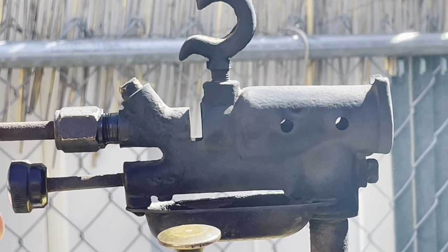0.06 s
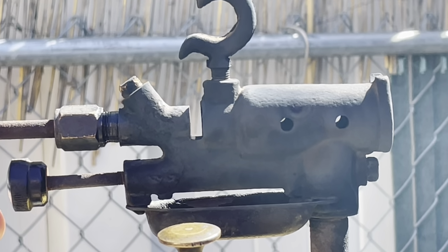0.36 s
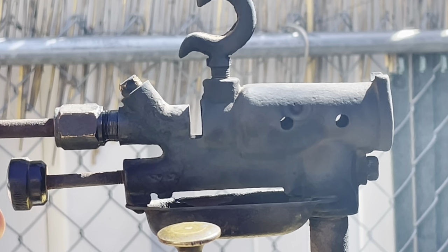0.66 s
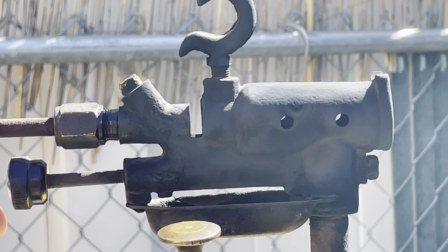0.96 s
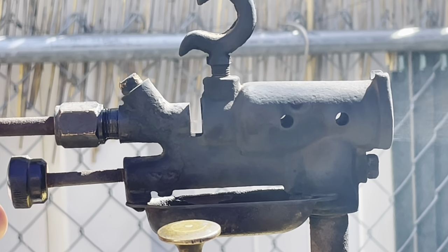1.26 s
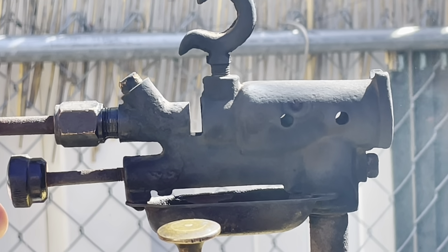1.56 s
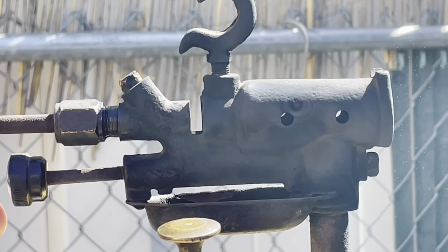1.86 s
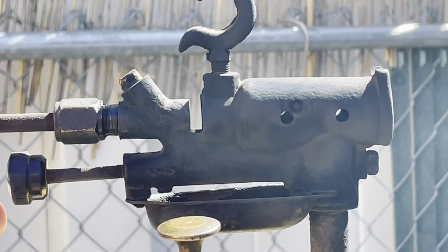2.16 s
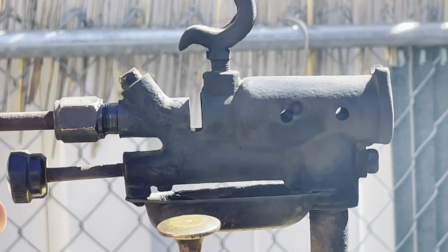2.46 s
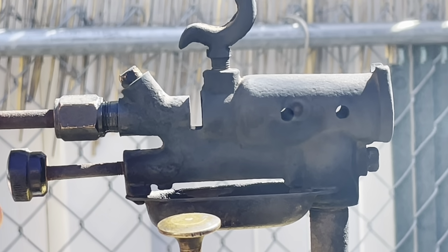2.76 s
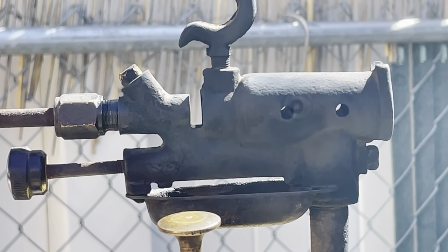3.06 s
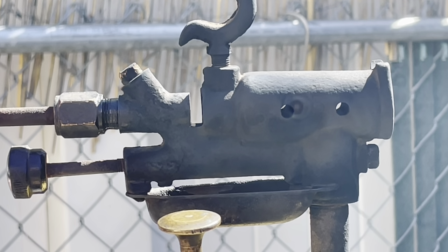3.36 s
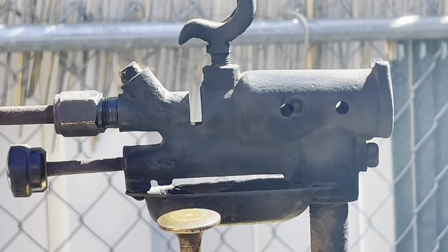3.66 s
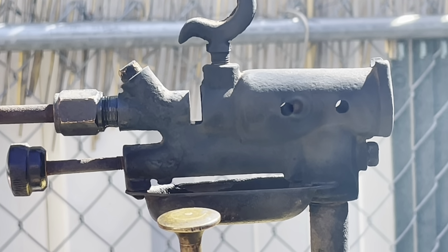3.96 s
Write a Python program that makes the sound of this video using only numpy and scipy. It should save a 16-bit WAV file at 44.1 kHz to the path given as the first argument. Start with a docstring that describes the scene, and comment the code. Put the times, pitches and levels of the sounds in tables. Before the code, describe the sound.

A blow torch burns close by outdoors, a fluttering roar and low rumble under a bright, ringing hiss. At about 1.25 seconds the flame falters: the roar drops, the ringing sags in pitch, and gas rushes and sizzles with a faint thin whistle. By about 1.8 seconds the roar and pitch have climbed back, and the torch burns steadily with small surges until 4 seconds.

```python
"""A fluttering roar with a bright hiss: a liquid-fuel blow torch burns outdoors, close by.
The swirling flame makes the rumble and roar. The jet of fuel vapour hisses and makes the
burner tube ring. After about 1.25 s the flame falters: the roar drops, the tube's pitch sags,
and gas rushes, sizzles and whistles. Within half a second the roar and the pitch climb back."""
import sys
import numpy as np
from scipy import signal
from scipy.fft import rfft, irfft, next_fast_len
from scipy.io import wavfile
from scipy.ndimage import uniform_filter1d, map_coordinates

SR = 44100
rng = np.random.default_rng(int(sys.argv[2]) if len(sys.argv) > 2 else 0)


def dump(signal):
    """Clip the signal to [-1, 1] and save it as 16-bit WAV at the path in sys.argv[1]."""
    limited = np.clip(np.atleast_2d(signal).T, -1, 1)
    pcm = np.round(limited * 32767).astype(np.int16)
    wavfile.write(sys.argv[1], SR, pcm)


N = 176400  # 4 s


def amp(db):
    """Turn decibels into a number to multiply by."""
    return 10 ** (np.asarray(db) / 20)


def unit(x):
    """Scale a signal to an average size (rms) of 1."""
    return x / np.sqrt(np.mean(x ** 2) + 1e-20)


def over_frequency(rows, hz):
    """Join (frequency, value) points with lines, on a scale of octaves."""
    f, value = np.transpose(rows)
    return np.interp(np.log(hz + 1), np.log(f + 1), value)


def over_time(rows):
    """Join (time, value) points with lines, one value per sample."""
    return np.interp(np.arange(N) / SR, *np.transpose(rows))


def filtered(x, response):
    """Multiply each frequency in x by response(hz)."""
    size = x.shape[-1]
    padded = next_fast_len(size + SR // 4)
    hz = np.fft.rfftfreq(padded, 1 / SR)
    return irfft(rfft(x, padded) * response(hz), padded)[..., :size]


def wobble(per_s):
    """A smooth curve through per_s random points a second."""
    points = rng.standard_normal(N // 8)
    return unit(map_coordinates(points, [np.arange(N) * per_s / SR], mode="wrap"))


def flutter(slowest_hz=49):
    """A quick random tremble with no slow drift."""
    return unit(filtered(wobble(per_s=200), lambda hz: 1 - np.exp(-(hz / slowest_hz) ** 2)))


def churn(swirls, sway_db, flutter_db, crackle_db, own_db):
    """The flame's swirls shake a layer's loudness, and the layer adds a flutter of its own."""
    sway, tremble, crackle = swirls
    return unit(amp(sway_db * sway + flutter_db * tremble + crackle_db * crackle + own_db * flutter()))


def roughen(x, depth_db):
    """Turn brief random patches of the sound up or down, each about 1.5 kHz wide."""
    spectra = signal.stft(x, nperseg=256)[2]
    patches = uniform_filter1d(rng.standard_normal(spectra.shape[1:]), size=9, axis=0)
    patches = uniform_filter1d(patches, size=3, axis=1)
    rough = signal.istft(spectra * amp(depth_db * unit(patches)), nperseg=256)[1]
    return unit(rough[:, :N])


# How alike left and right are, 1 meaning the same (f/Hz, likeness)
LIKENESS = [(40, 0.94), (100, 1), (900, 0.98), (1400, 0.89), (1700, 0.35), (1950, .995), (3400, 0.97),
            (3900, .999), (6100, .999), (6500, 1), (10000, 1), (11500, .97), (15000, 1)]
def stereo_noise(gain, size=N):
    """Noise shaped by gain(hz): a part both sides share, plus a part that sets them apart."""
    def shares(hz):
        angle = np.arccos(np.clip(over_frequency(LIKENESS, hz), -1, 1)) / 2
        return gain(hz) * np.array([np.cos(angle), np.sin(angle)])
    mid, side = filtered(rng.standard_normal((2, size)), shares)
    return unit(np.array([mid + side, mid - side]))


def ringing(bands, pitch):
    """Bands of noise that slide together: a pitch below 1 plays them slower, and so lower."""
    def gain(hz):
        peaks = (amp(db) / (1 + ((hz - centre) / (width / 1.7)) ** 2) for centre, width, db in bands)
        return np.sqrt(sum(peak ** 2 for peak in peaks))
    noise = stereo_noise(gain, size=N + SR // 4)
    position = np.cumsum(pitch)
    return unit(np.array([map_coordinates(side, [position], order=5, mode="mirror") for side in noise]))


# The whistle's wandering pitch and loudness (t/s, f/Hz, level/dB)
WHISTLE_PATH = [(0, 7000, -90), (1.235, 7000, -70), (1.266, 6680, -41), (1.288, 6600, -60),
                (1.31, 6750, -47.5), (1.34, 6250, -57), (1.41, 6250, -56), (1.45, 6550, -51),
                (1.495, 6850, -46), (1.515, 6750, -54), (1.535, 6950, -49.5), (1.57, 7200, -57),
                (1.66, 7350, -90)]
def whistle(width_hz=320):
    """The jet whistles thinly while the flame is weak, more breath than tone."""
    hz = over_time([(t, f) for t, f, db in WHISTLE_PATH])
    level_db = over_time([(t, db) for t, f, db in WHISTLE_PATH])
    return amp(level_db) * ringing([(hz.mean(), width_hz, 0)], pitch=hz / hz.mean())


# Loudness of the sizzle (t/s, level/dB)
SIZZLE_LEVEL = [(0, -90), (1.16, -75), (1.2, -54), (1.26, -45), (1.3, -47), (1.42, -44.5), (1.53, -49),
                (1.65, -53), (1.9, -90)]
# Its two high bands (f/Hz, width/Hz, relative level/dB)
SIZZLE_PEAKS = [(8700, 910, 6), (11750, 1500, -6)]
def sizzle():
    """The jet sizzles while the flame is weak."""
    return amp(over_time(SIZZLE_LEVEL)) * ringing(SIZZLE_PEAKS, pitch=np.ones(N))


# Loudness of the rushing gas (t/s, level/dB)
GAS_LEVEL = [(0, -90), (1.24, -80), (1.28, -42), (1.38, -41), (1.47, -33.5), (1.55, -40), (1.68, -46),
             (1.8, -90)]
# Its bands (f/Hz, width/Hz, relative level/dB)
GAS_PEAKS = [(1229, 440, 0), (2070, 250, -7), (2760, 270, -3), (3300, 250, -2)]
def gas_rush():
    """Gas rushes through the tube while the flame is weak."""
    return amp(over_time(GAS_LEVEL)) * ringing(GAS_PEAKS, pitch=np.ones(N))


# Tone colour of the hiss (f/Hz, relative level/dB)
HISS_COLOUR = [(1000, -12.5), (1350, -2), (1700, -16), (1860, -1.8), (2400, -7), (3400, 0), (3620, -3),
               (3780, -6), (4000, -5), (4300, -10), (4900, -9), (5200, -14.5), (5480, -13), (5700, -21),
               (5950, -15), (6300, -17.5), (6700, -17), (9000, -24), (9850, -26), (10700, -23),
               (12500, -30), (15800, -33)]
def jet_hiss(strength_db, swirls, level_db=-38):
    """The vapour jet hisses roughly, and dips less than the flame does."""
    hiss = roughen(stereo_noise(lambda hz: amp(over_frequency(HISS_COLOUR, hz))), depth_db=1.5)
    hiss *= churn(swirls, sway_db=0.2, flutter_db=0.74, crackle_db=1.54, own_db=0.56)
    return amp(level_db + 0.45 * strength_db) * hiss


# The tube's main pitch (t/s, f/Hz)
TUBE_PITCH = [(0, 3430), (1.12, 3427), (1.23, 3310), (1.29, 2816), (1.39, 2787), (1.48, 2934), (1.62, 3216),
              (1.76, 3355), (2.1, 3415), (4, 3394)]
def tube_pitch(full_flame_hz=3420):
    """The tube's pitch, about 1 at full flame; it sags and wavers more as the flame falters."""
    pitch = over_time(TUBE_PITCH) / full_flame_hz
    sag = np.tanh(np.maximum(1 - pitch, 0) / 0.05006)  # levels off past a drop of about 5 %
    waver = .006 + 0.0219 * sag
    return pitch * (1 + waver * wobble(per_s=75))


# Where the tube rings at full flame, main and upper bands (f/Hz, width/Hz, relative level/dB)
MAIN_PEAKS = [(3446, 274, 2), (3190, 420, -5.5), (2710, 380, -13)]
UPPER_PEAKS = [(4670, 870, -5), (7340, 1120, 2.2), (8830, 1070, -0.5), (10760, 1050, -6.5),
               (13400, 1500, -16)]
# How each set swells and fades (t/s, relative level/dB)
MAIN_SWELLS = [(0, 0.6), (.65, -0.5), (1.2, -1), (1.255, -1.5), (1.283, -8), (1.305, -5), (1.37, -4.5),
               (1.435, -2.5), (1.467, 4), (1.5, 0.5), (1.63, 0.5), (1.8, 1), (4, .5)]
UPPER_SWELLS = [(0, 1), (.6, 1.5), (.76, 5), (.86, -1.5), (1.25, 0), (1.35, -4.5), (1.7, 1), (2.1, -1.5),
                (4, -1)]
def burner_tube(swirls, main_db=-31, upper_db=-47.5, edge_hz=3620):
    """The jet makes the tube ring; the main ring falls away steeply above edge_hz."""
    pitch = tube_pitch()
    main = filtered(ringing(MAIN_PEAKS, pitch), lambda hz: 1 / np.sqrt(1 + (hz / edge_hz) ** 70))
    main *= churn(swirls, sway_db=0.2, flutter_db=0.93, crackle_db=1.5, own_db=1.6)
    main *= amp(main_db + over_time(MAIN_SWELLS))
    upper = roughen(ringing(UPPER_PEAKS, pitch), depth_db=1.1)
    upper *= churn(swirls, sway_db=0.6, flutter_db=0.45, crackle_db=0.9, own_db=-0.4)
    upper *= amp(upper_db + over_time(UPPER_SWELLS))
    return main + upper


# The flame's brief surges (+) and lulls (-) (t/s, length/s, relative level/dB)
FLAME_SURGES = [(0.025, .05, 5), (.192, 0.032, 3.5), (0.267, 0.033, -5.5), (0.623, .04, -2),
                (0.698, 0.037, 7.5), (0.765, 0.019, 7), (.96, .035, 5), (1.305, .025, 9.5),
                (1.344, .035, -2), (1.62, .03, 3.5), (1.658, 0.037, -7.5), (1.745, 0.032, 5),
                (1.81, .04, 3.5), (1.938, 0.031, 7.5), (2.25, .03, -1), (2.5, 0.025, 2), (3.15, 0.034, 3),
                (3.22, 0.032, 3), (3.294, .02, -4), (3.33, .03, 3.5), (3.634, 0.058, 3.5), (3.717, .03, -5),
                (3.767, .035, 4)]
def surge_db():
    """Each surge or lull is a smooth bump in loudness."""
    t = np.arange(N) / SR
    return sum(db * np.exp(-(2 * (t - peak) / length) ** 2) for peak, length, db in FLAME_SURGES)


# Tone colour of the flame (f/Hz, relative level/dB)
FLAME_COLOUR = [(22, -32.1), (35, -10), (60, -10), (95, 1.5), (125, -4), (190, -2.5), (245, -6),
                (362, -5.5), (410, -15.5), (465, -6.5), (510, -6), (600, -8), (800, -12.5), (1000, -14.5),
                (1300, -15.5), (1550, -23), (1720, -31), (1880, -22), (2500, -27), (3400, -33), (5000, -69)]
def flame_colour(hz, low, split_hz=279):
    """The low part of the flame's sound (rumble), or else the high part (roar)."""
    low_share = 1 / (1 + (hz / split_hz) ** 6)
    return amp(over_frequency(FLAME_COLOUR, hz)) * np.sqrt(low_share if low else 1 - low_share)


# Slow swells of the whole rumble, and of the boom inside it (t/s, relative level/dB)
RUMBLE_SWELLS = [(0, 0), (.3, 1.5), (.6, 0.5), (.72, -1.5), (1.05, -1.5), (1.35, 1.5), (1.55, -0.5),
                 (1.8, 2), (2.1, -2), (2.5, -0.5), (2.9, -2), (3.3, 1), (4, 0)]
BOOM_SWELLS = [(0, -4), (.75, 1), (1.15, -1.5), (1.5, -3), (1.85, -10.5), (2.3, -1), (2.6, 3.5), (3.3, 2),
               (4, -1.5)]
def flame_rumble(strength_db, swirls, level_db=-26, boom_hz=92, boom_half_width_hz=19):
    """The burning fuel rumbles, with a deep boom that comes and goes."""
    rumble = stereo_noise(lambda hz: flame_colour(hz, low=True))
    boom = filtered(rumble, lambda hz: np.exp(-((hz - boom_hz) / boom_half_width_hz) ** 2))
    rumble = rumble - boom + amp(over_time(BOOM_SWELLS)) * boom
    sway = swirls[0]
    return rumble * amp(level_db + strength_db + over_time(RUMBLE_SWELLS) + surge_db() + .3 * sway)


def flame_roar(strength_db, swirls, level_db=-27):
    """The swirling flame burns unevenly, so its roar flutters."""
    bursts = stereo_noise(np.ones_like)
    bursts *= churn(swirls, sway_db=0.8, flutter_db=0.98, crackle_db=1.05, own_db=0.7)
    roar = unit(filtered(bursts, lambda hz: flame_colour(hz, low=False)))
    return roar * amp(level_db + 0.98 * strength_db + 0.23 * surge_db())


# How much louder the left side is than the right (f/Hz, level/dB)
LEFT_LOUDER = [(50, -.3), (120, -1.5), (360, -1.5), (520, -2.5), (1060, -1), (1400, 2), (1600, 9.5),
               (1780, -10), (1950, 0.5), (3100, 0.5), (4000, 0)]
# How far the left side's wave runs ahead (f/Hz, phase/rad)
LEFT_AHEAD = [(30, 0), (1000, 0.14), (1400, 0.66), (1900, 0.5), (3000, 0.2), (3900, 0), (6100, 0),
              (6400, -1), (6900, -1.1), (8200, -3), (9500, -4.5), (11100, -6), (12400, -5.5), (14000, -11)]
def path_to_microphone(hz, echo_s=.0063, echo_db=-20):
    """The ground adds a faint echo, and the sound reaches left and right slightly apart."""
    ground = 1 + amp(echo_db) * np.exp(-2j * np.pi * hz * echo_s)
    half_each = np.array([[.5], [-.5]])
    balance = amp(half_each * over_frequency(LEFT_LOUDER, hz))
    timing = np.exp(1j * half_each * over_frequency(LEFT_AHEAD, hz))
    return ground * balance * timing


# Strength of the flame, with its one deep dip (t/s, relative level/dB)
FLAME_STRENGTH = [(0, 0), (.1, -0.4), (.75, -0.5), (1.1, -0.1), (1.245, 0), (1.275, -10), (1.41, -9),
                  (1.46, -5.5), (1.5, -6.5), (1.53, -3.5), (1.61, 0), (1.69, -2), (1.76, -0.7), (2.9, 1),
                  (3.3, 0.3), (3.68, 1.5), (4, 0)]
def scene():
    """The same swirls shake flame, jet and tube; three more sounds join as the flame falters."""
    strength_db = over_time(FLAME_STRENGTH)
    swirls = wobble(per_s=22), flutter(), wobble(per_s=500)  # sway, tremble, crackle
    flame = flame_rumble(strength_db, swirls) + flame_roar(strength_db, swirls)
    torch = flame + jet_hiss(strength_db, swirls) + burner_tube(swirls)
    falter = gas_rush() + sizzle() + whistle()
    return filtered(torch + falter, path_to_microphone)


def record(dry, low_cut_hz=41.6, top_hz=13800):
    """The microphone loses the deepest bass and the very highest treble."""
    return filtered(dry, lambda hz: (hz < top_hz) * (1 - np.exp(-(hz / low_cut_hz) ** 2)))


dry = scene()
out = record(dry)
dump(out)
```